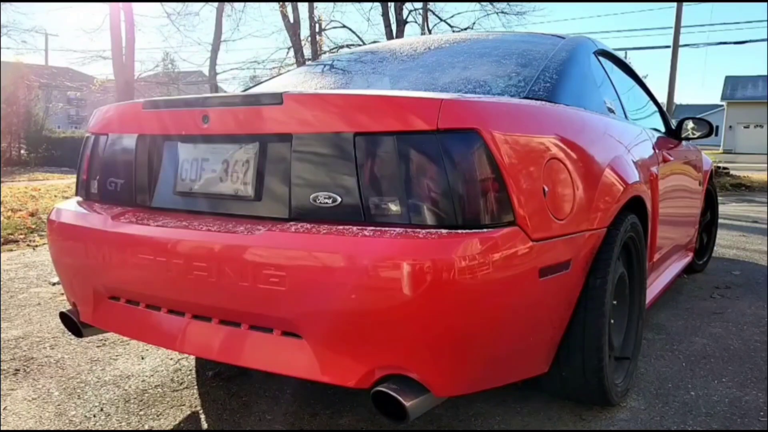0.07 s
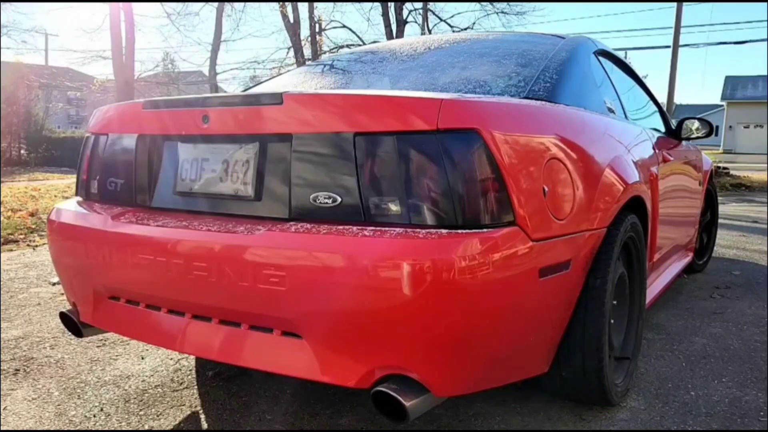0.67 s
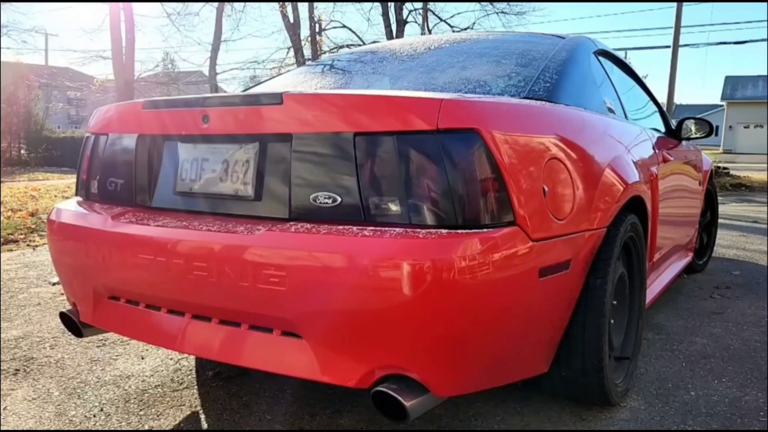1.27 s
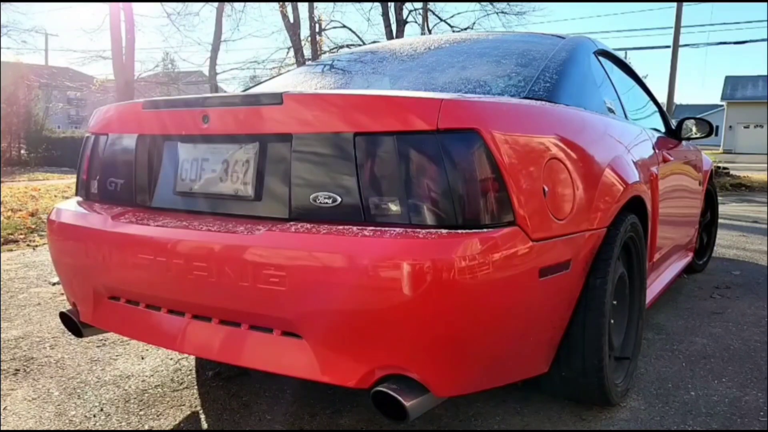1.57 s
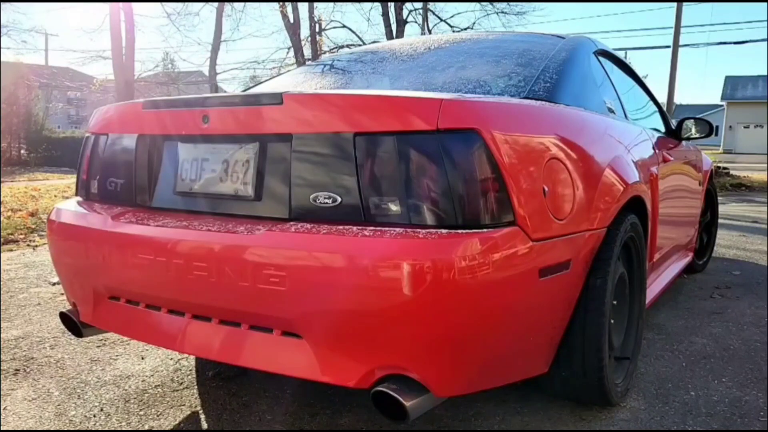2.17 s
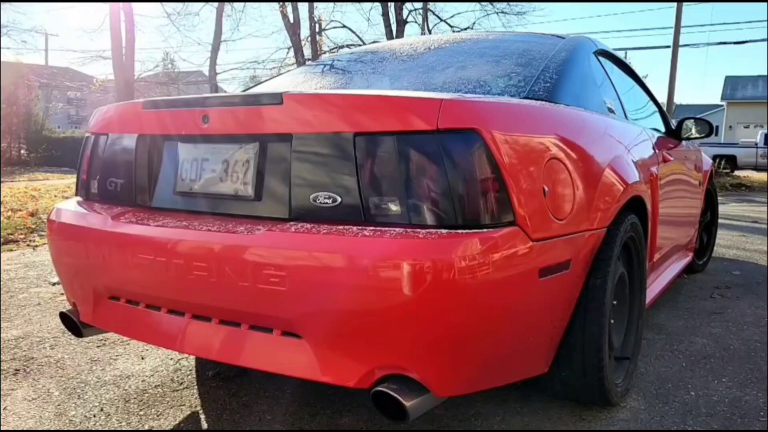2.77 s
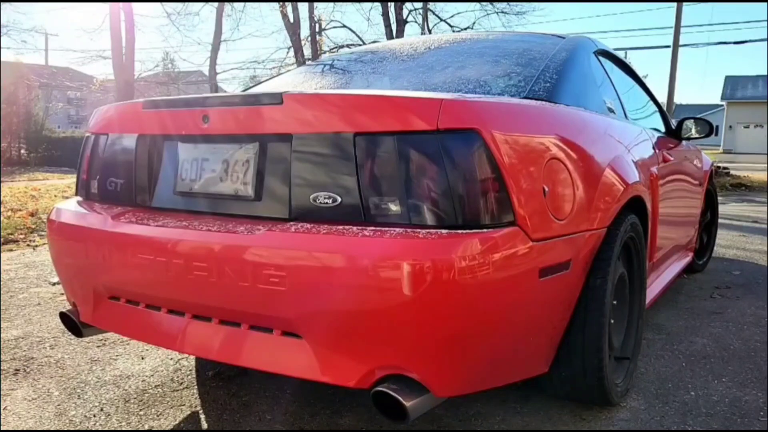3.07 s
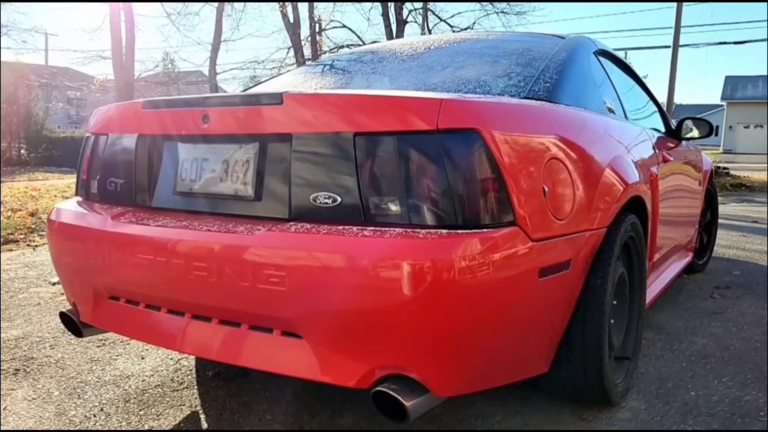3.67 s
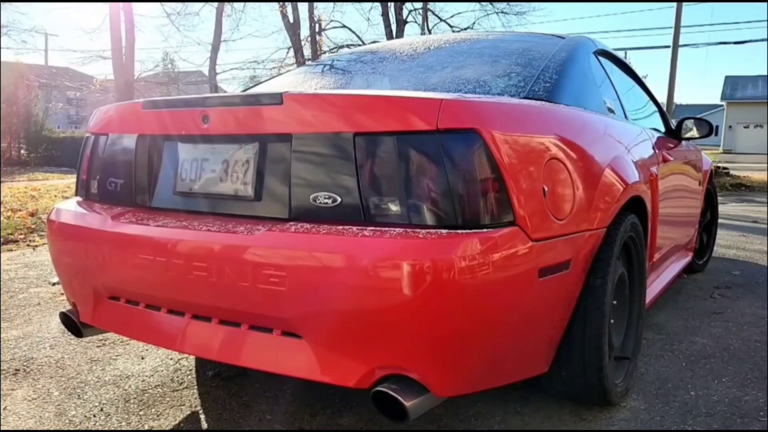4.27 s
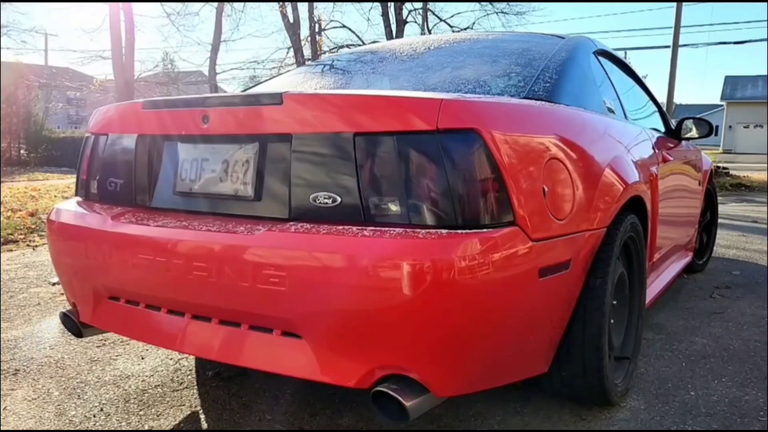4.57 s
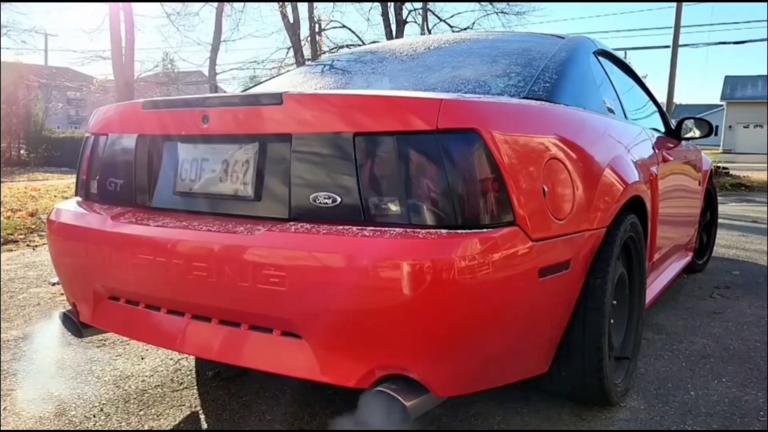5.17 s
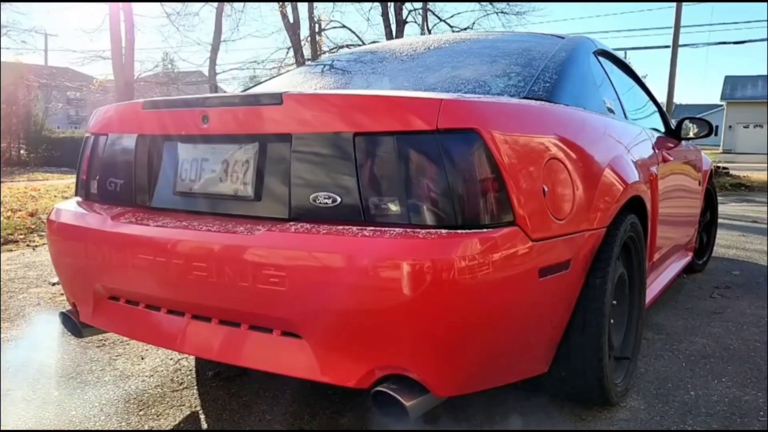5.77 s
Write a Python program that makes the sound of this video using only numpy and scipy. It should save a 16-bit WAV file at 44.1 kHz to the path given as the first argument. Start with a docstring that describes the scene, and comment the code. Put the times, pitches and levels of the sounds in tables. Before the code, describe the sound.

After faint distant traffic, a car engine cranks, fires loudly, revs briefly and drops to a deep, throbbing exhaust rumble.

```python
"""A cold V8 starts on a quiet driveway, heard from just behind its twin tailpipes.
Distant traffic hums and swells. The starter slams in with a clash of teeth, then grinds and groans
against each compression. The engine catches and the street fades down: heavy firings thump, unburnt
fuel pops and air rushes out. The revs flare and sink into a loping fast idle, eight unequal firings
ringing two pipes, while gas hisses out and a thin whistle comes and goes."""
import sys
import numpy as np
from scipy import signal
from scipy.fft import rfft, irfft
from scipy.io import wavfile
from scipy.ndimage import uniform_filter1d

SR = 44100
rng = np.random.default_rng(int(sys.argv[2]) if len(sys.argv) > 2 else 0)


def inscribe(sig):
    """Save sig as 16-bit PCM at rate SR to the path in sys.argv[1].

    A 1-D sig is mono; a 2-D sig holds one channel per row.
    Samples are clipped to [-1, 1] before scaling.
    """
    pcm = np.round(np.clip(np.atleast_2d(sig).T, -1, 1) * 32767)
    wavfile.write(sys.argv[1], SR, pcm.astype(np.int16))


N = 256662
TIME, FREQS = np.arange(N) / SR, np.fft.rfftfreq(N, 1 / SR)

# starter teeth striking as they mesh: start_s, level_db
TOOTH_STRIKES = [(2.351, -17), (2.365, -22.5), (2.38, -43), (2.396, -37), (2.728, -43), (2.763, -31)]
# fuel popping in the pipes: start_s, level_db
FUEL_POPS = [(3.107, -32), (3.121, -7.5), (3.139, -4.5), (3.192, -7), (3.201, -8), (3.221, -4),
             (3.277, -14.5), (3.343, -22.5)]
# the crank flares, sags and recovers: time_s, speed_rpm
CRANK_SPEED = [(3.05, 750), (3.18, 1470), (3.38, 1910), (3.48, 1880), (3.7, 1470), (3.95, 1240),
               (4.25, 1082), (4.55, 1072), (5.1, 1131), (5.82, 1160)]
# how hard the cylinders fire: time_s, effort_db
FIRING_EFFORT = [(3.2, 3), (3.32, 2), (3.7, 0), (4.2, -3), (4.75, 1.7), (5.3, 3.5), (5.8, 3.5)]


def gain_of(db):
    """Decibels to gain."""
    return 10 ** (np.asarray(db) / 20)


def unit_rms(x):
    """Scales to rms 1."""
    return x / np.sqrt(np.mean(x ** 2) + 1e-20)


def local_power(x, samples):
    """Mean square under a sliding soft window."""
    window = np.hanning(samples)
    return abs(signal.fftconvolve(x ** 2, window / window.sum(), "same"))


def levelled(x):
    """Rides the level to rms 1 over a few engine cycles, keeping the throb within a cycle."""
    return x / np.sqrt(local_power(x, SR // 3) + 1e-20)


def automation(points):
    """Joins (time_s, value) points with straight lines."""
    return np.interp(TIME, *np.transpose(points))


def spectrum(points):
    """Joins (frequency_hz, value) points on a log-frequency axis."""
    hz, value = np.transpose(points)
    return np.interp(np.log(FREQS + 1), np.log(hz + 1), value)


def ramp(start_s, length_s):
    """A straight fade from 0 to 1."""
    return np.clip((TIME - start_s) / length_s, 0, 1)


def burst(start_s, decay_s):
    """A sudden attack and an exponential fall."""
    return ramp(start_s, 0.00088) * np.exp(-np.maximum(TIME - start_s, 0) / decay_s)


def swell(x, centre, width):
    """A bell of height 1 around the centre."""
    return np.exp(-((x - centre) / width) ** 2)


def wobble(seconds, points=4096):
    """A smooth random drift of rms 1 that changes over the given time."""
    hz = np.fft.rfftfreq(points, TIME[-1] / points)
    drift = irfft(rfft(rng.standard_normal(points)) * np.exp(-(hz * seconds) ** 2))
    return np.interp(TIME, np.linspace(0, TIME[-1], points), unit_rms(drift))


def noise(colour, grain_db=0):
    """Coloured stereo noise, centred in the bass and wide in the treble; grain_db makes it gritty."""
    # how alike the two ears are: frequency_hz, correlation
    ear_likeness = [(60, 1), (300, 0.89), (700, 0.72), (1500, 0.23), (3000, 0.044), (15000, 0.04)]
    a, b = rng.standard_normal((2, N)) * gain_of(grain_db * np.minimum(rng.exponential(1, N), 5))
    alike = np.clip(spectrum(ear_likeness), 0, 1)
    mid, side = np.sqrt(1 + alike) * rfft(a), np.sqrt(1 - alike) * rfft(b)
    return unit_rms(irfft(np.array([mid + side, mid - side]) * gain_of(spectrum(colour)), N))


def ring(blows, modes, rise_s):
    """Every blow sets the same decaying modes ringing."""
    t, out = np.arange(SR // 2) / SR, np.zeros(N)
    tone = sum(gain_of(db - 60 * t / t60) * np.sin(2 * np.pi * hz * t) for hz, db, t60 in modes)
    tone *= 1 - np.exp(-t / rise_s)
    for s, db in blows:
        out[round(s * SR):][:len(t)] += gain_of(db) * tone / abs(tone).max()
    return out


def tones(rows, fade_s, rise_hz_per_s=0):
    """Held tones that fade in and out and may glide upward."""
    out = np.zeros(N)
    for s, length_s, hz, db in rows:
        age = TIME - s
        fades = ramp(s, fade_s) * (1 - ramp(s + length_s - fade_s, fade_s))
        out += gain_of(db) * np.sqrt(2) * fades * np.sin(2 * np.pi * (hz + rise_hz_per_s * age / 2) * age)
    return out


def off_centre(pair, lag_s):
    """A source off to one side reaches the left ear later."""
    left = irfft(rfft(pair[0]) * np.exp(-2j * np.pi * FREQS * lag_s), N)
    return np.array([left * ramp(0, 0.0069), pair[1]])


def underbody_echoes(pair, db, spread_s=0.025, count=8):
    """A handful of early reflections between the underbody and the ground."""
    delay_s, sign = rng.uniform(0.1, 1, count) * spread_s, rng.choice([-1, 1], count)
    reflections = sign @ np.exp(-2j * np.pi * np.outer(delay_s, FREQS)) / np.sqrt(count)
    return irfft(rfft(pair) * (1 + gain_of(db) * reflections), N) / np.sqrt(1 + gain_of(db) ** 2)


def traffic(pass_s=2.69, pass_width_s=0.53, fade_from_s=3.0, fade_db_per_s=14):
    """Distant traffic swells and brightens; the whole street fades down as the engine catches."""
    # tone of the road's rumble, roar and tyre hiss: frequency_hz, level_db
    rumble_colour = [(15, -33.5), (25, -19.5), (43, -5.5), (97, -2.5), (119, -9.5), (146, -3.5), (252, -19),
                     (288, -15.5), (317, -25.5), (358, -15.5), (450, -47), (580, -68), (990, -120)]
    roar_colour = [(260, -43.5), (450, -14.5), (571, -11), (724, -1.5), (847, -4.5), (919, -12.5),
                   (1100, -10), (1820, -19.5), (2500, -22), (3200, -34.5), (4160, -60.5), (7040, -120)]
    tyre_colour = [(1760, -30), (3000, -3), (5020, -2), (6580, -10), (7510, -5), (10300, -21), (10900, -34),
                   (12800, -23), (15800, -30.5)]
    # low hums from the road: start_s, length_s, pitch_hz, level_db
    hums = [(.02, 0.48, 48.2, -41), (1.65, 0.73, 58, -43.5)]
    near = 1 / np.hypot(1, (TIME - pass_s) / pass_width_s)
    muffled = 1 - ramp(0.25, 0.43)  # the tyre noise starts dull, then opens up
    rumble = gain_of(-41) * noise(rumble_colour)
    roar = gain_of(-52 + 5 * near + 1.37 * wobble(0.14) - 2 * muffled) * noise(roar_colour)
    tyres = gain_of(-74 + 18 * near - 5 * muffled) * noise(tyre_colour)
    street_fade = gain_of(-fade_db_per_s * np.maximum(TIME - fade_from_s, 0))
    return (rumble + roar + tyres + tones(hums, fade_s=0.054)) * street_fade


def ticks():
    """Faint, gritty ticks and rustles close by."""
    # each tick: start_s, level_db, decay_s
    hits = [(.05, -91, 0.0086), (0.134, -59.5, 0.03), (.38, -66, 0.11), (.52, -69, 0.033)]
    # their thin tone: frequency_hz, level_db
    colour = [(2000, -8), (3800, 1), (5500, -12), (7000, -1), (9500, -8), (12000, -22)]
    return noise(colour, grain_db=4.5) * sum(gain_of(db) * burst(s, decay_s) for s, db, decay_s in hits)


def whistle():
    """A thin tone from the engine bay at idle, rising a little in each spurt."""
    # each spurt: start_s, length_s, start_pitch_hz, level_db
    spurts = [(4.33, .135, 3150, -70), (4.49, .14, 3150, -72), (4.68, .06, 3205, -72),
              (4.77, .09, 3150, -68)]
    return tones(spurts, fade_s=0.013, rise_hz_per_s=280)


def chuff(start_s=2.722, attack_s=0.012, decay_s=0.03):
    """A short puff of air escapes while the engine turns over."""
    # its bright tone: frequency_hz, level_db
    colour = [(1500, -20), (5000, 3), (9000, -8), (12000, -11), (15500, 5)]
    return gain_of(-39) * burst(start_s, decay_s) * ramp(start_s, attack_s) * noise(colour)


def tooth_clashes(t60_s=0.075, scrape_db=-10, scrape_decay_s=0.046):
    """The starter's teeth strike with a bright scrape and ring the housing."""
    # tone of the scrape: frequency_hz, level_db
    scrape_colour = [(600, -27), (1400, 6.5), (2800, -2.5), (4500, -9), (8000, -7.5), (11000, -21),
                     (15500, -17)]
    # modes of the housing: pitch_hz, level_db
    housing = [(657, -3.5), (1042, 1), (1227, 1.5), (1570, -1), (1765, -5), (2055, -1), (2690, -1.5),
               (3290, -13), (3850, -15), (4610, -12)]
    envelope = sum(gain_of(db + scrape_db) * burst(s, scrape_decay_s) for s, db in TOOTH_STRIKES)
    clang = ring(TOOTH_STRIKES, [(hz, db, t60_s) for hz, db in housing], rise_s=0.0012)
    return noise(scrape_colour, grain_db=1.5) * envelope + clang


def starter(engage_s=2.346, release_s=3.134, load_width_s=0.0317, groan_width_s=0.031,
            sag_hz_per_s=615, housing_hz=1050, housing_width_hz=45):
    """The gears grind and the motor groans against each compression, then the pinion lets go."""
    # compressions loading the motor: peak_s, chug_db, groan_db, pitch_hz, third_harmonic_db
    compressions = [(2.4, -34, -37.5, 335, -56), (2.53, -53, -40, 300.4, -53),
                    (2.615, -31.5, -46, 318.6, -46), (2.747, -35, -29, 331.8, -29.5),
                    (2.871, -45, -27.5, 349.7, -34.5), (2.995, -35.5, -34, 378, -33)]
    # tone of the grinding gears and of the low chug: frequency_hz, level_db
    grind_colour = [(150, -26), (250, -15), (336, -6.5), (443, -13.5), (672, -10.5), (967, -9), (1040, -14),
                    (1190, -10), (1900, -13.5), (2510, -11), (3150, -20), (3810, -16.5), (7490, -28),
                    (11200, -37.5), (15800, -38)]
    chug_colour = [(15, -26), (25, 1.5), (70, -2), (102, 4.5), (140, -5.5), (239, -5.5), (300, -6),
                   (390, -23), (660, -120)]
    nearest = np.argmin([abs(TIME - row[0]) for row in compressions], axis=0)
    peak_s, chug_db, groan_db, pitch_hz, third_db = np.array(compressions)[nearest].T
    load = swell(TIME, peak_s, load_width_s)
    # the motor slows through each compression
    mesh_hz = pitch_hz - sag_hz_per_s * np.clip(TIME - peak_s, -load_width_s, load_width_s)
    jitter = unit_rms(uniform_filter1d(rng.standard_normal(N), SR // 400))
    mesh = 2 * np.pi * np.cumsum(mesh_hz * (1 + 0.019 * jitter)) / SR

    grind = unit_rms(noise(grind_colour, grain_db=1.5) * (1 + 0.26 * np.cos(mesh)))
    strain = gain_of(0.26 * (groan_db - groan_db.max()))  # harder compressions grind louder
    bite = burst(TOOTH_STRIKES[0][0], decay_s=0.03)
    grind = underbody_echoes(grind, db=-3) * gain_of(-33.5 + 4 * load * strain + 5 * bite)
    chug = (gain_of(-42) + gain_of(chug_db) * load) * noise(chug_colour)
    groan = np.sin(mesh) + gain_of(-14) * np.sin(2 * mesh)
    groan *= gain_of(groan_db) * swell(TIME, peak_s, groan_width_s)
    # the third harmonic sings as it slides through a resonance of the housing
    detuning = (3 * mesh_hz - housing_hz) / housing_width_hz
    whine = gain_of(third_db) * load * np.sin(3 * mesh) / np.hypot(1, detuning)
    return (grind + chug + groan + whine) * ramp(engage_s, 0.0027) * (1 - ramp(release_s, 0.16))


def engine_catch(puff_decay_s=0.0052, bark_waver=0.0151):
    """The first firings thump, unburnt fuel pops with a puff and a crack, and the pipes bark briefly."""
    # first heavy firings: start_s, level_db
    firings = [(3.047, -17), (3.077, -1), (3.1, -7)]
    # ring of a thump and of a pop's crack: pitch_hz, level_db, t60_s
    thump_modes = [(94.2, 15, 0.087), (47.6, -0.5, 0.22), (135.3, -4.5, 0.26)]
    crack_modes = [(380, -2, 0.01), (950, -0.5, 0.0082), (1400, 0, 0.0073), (3670, -11, 0.0047)]
    # tone of a pop's puff: frequency_hz, level_db
    puff_colour = [(150, -10), (350, 16), (600, -22), (1000, 1), (1650, -8.5), (2200, -30), (6000, -26),
                   (15000, -50)]
    # upper pipe resonances singing out: peak_s, half_length_s, pitch_hz, level_db
    bark_notes = [(3.111, .018, 282, -17.5), (3.135, 0.021, 362, -17), (3.203, 0.041, 358, -14),
                  (3.219, 0.021, 258, -21), (3.276, 0.021, 294, -18)]
    thumps = ring(firings, thump_modes, rise_s=0.0064)
    puffs = noise(puff_colour) * sum(gain_of(db - 4) * burst(s, puff_decay_s) for s, db in FUEL_POPS)
    cracks = gain_of(-1) * ring(FUEL_POPS, crack_modes, rise_s=0.00026)
    wavering_time = np.cumsum(1 + bark_waver * wobble(0.011)) / SR
    barks = sum(gain_of(db) * swell(TIME, s, half_s) * np.sin(2 * np.pi * hz * wavering_time)
                for s, half_s, hz, db in bark_notes)
    return puffs - cracks - thumps + np.sqrt(2) * barks


def gas_rush(flow, peak_s=3.119, rise_db_per_s=121, fall_db_per_s=66, tail_db_per_s=24, pulsing=0.16):
    """Air rushes at the catch; then gas hisses out with the effort, harder on each outward pulse."""
    # tone of the rush and of the idle hiss: frequency_hz, level_db
    rush_colour = [(290, -48), (500, 0), (677, -8), (1060, -9.5), (1170, -17), (1300, -12.5), (2280, -26.5),
                   (4060, -19.5), (4760, -19), (7040, -20), (9120, -23.5), (14900, -26.5), (15800, -23)]
    hiss_colour = [(280, -27), (480, -8.5), (564, -2.5), (615, -9), (672, -3.5), (712, -14), (801, -8.5),
                   (983, -11.5), (1150, -8), (2040, -16.5), (2660, -23), (5050, -24), (15100, -32.5),
                   (15800, -29.5)]
    before, after = np.maximum(peak_s - TIME, 0), np.maximum(TIME - peak_s, 0)
    attack = gain_of(-rise_db_per_s * before) * ramp(3.04, 0.014)
    gulp = gain_of(-25 - fall_db_per_s * after) + gain_of(-46 - tail_db_per_s * after)
    blast = gain_of(-20) * burst(FUEL_POPS[2][0], decay_s=0.0057)  # one early pop drives out air
    rush = noise(rush_colour, grain_db=4.5) * (gulp + blast) * attack
    hiss_db = -53.5 + 1.17 * automation(FIRING_EFFORT)
    hiss = noise(hiss_colour, grain_db=1.5) * gain_of(hiss_db) * ramp(3.57, 0.4)
    return (rush + hiss) * np.maximum(1 + pulsing * levelled(flow), 0)


def crank_cycles(zero_s=5.2):
    """Running count of four-stroke cycles, two turns of the crank each."""
    cycle = np.cumsum(automation(CRANK_SPEED)) / (120 * SR)
    return cycle - np.interp(zero_s, TIME, cycle)


def muffler(spectra, cutoff_hz=415, leak=0.06):
    """Turns spectra into sound through a steep low-pass that leaks a little treble."""
    return irfft(spectra * (1 / np.sqrt(1 + (FREQS / cutoff_hz) ** 24) + leak), N)


def pipe_resonances(cycle, scatter_db, tilt_pivot_hz=150):
    """Each cylinder's firings ring its bank's pipe; one signal per resonance, low to high."""
    # each cylinder: place_in_cycle_eighths, bank (0 or 1), strength_db, tilt_db_per_octave
    cylinders = [(0.25, 0, -1.2, 5.9), (1.42, 1, 4.4, -4.7), (2.25, 0, 3.1, -5.8), (3.23, 0, -9.4, 4.2),
                 (4.54, 1, -11.6, -0.9), (5.18, 0, 2.3, -4.5), (6.29, 1, 1.1, 4.0), (7.59, 1, 1.7, 1.2)]
    # resonances of each bank's pipe: pitch_hz, width_hz, level_db
    first_pipe = [(53.9, 13.6, -10.8), (106.9, 26.0, 0.2), (175.3, 43.9, -4.4), (286.2, 42.7, -5.2),
                  (368.1, 30.5, -11.7)]
    second_pipe = [(48.8, 10.5, -6.2), (116.7, 25.8, 2.2), (192.8, 49.4, -8.5), (287.0, 42.1, -6.0),
                   (356.0, 29.1, -9.4)]
    firings = [np.flatnonzero(np.diff(np.floor(cycle - row[0] / 8))) for row in cylinders]
    scatter = gain_of(scatter_db * rng.standard_normal(N))
    spectra = np.zeros((len(first_pipe), len(FREQS)), complex)
    for side, pipe in enumerate((first_pipe, second_pipe)):
        for k, (hz, width_hz, db) in enumerate(pipe):
            pulses, octaves = np.zeros(N), np.log2(hz / tilt_pivot_hz)
            for at, (_, bank, strength_db, tilt) in zip(firings, cylinders):
                if bank == side:
                    pulses[at] += scatter[at] * gain_of(db + strength_db + tilt * octaves)
            loss = 1j * FREQS * width_hz
            spectra[k] += rfft(pulses) * (loss / (hz ** 2 - FREQS ** 2 + loss)) ** 2
    return muffler(spectra)


def flare_overtones(cycle, drive, rough_db=3, jitter_rad=0.64):
    """Rough overtones ring through the muffler at the top of the flare."""
    # overtones of the racing engine: multiple_of_cycle_rate, level_db
    overtones = [(13, -28.5), (21, -29.5), (29, -33.5)]
    tone = np.zeros(N)
    for multiple, db in overtones:
        level = np.sqrt(2) * gain_of(db + rough_db * wobble(0.017))
        tone += level * np.sin(2 * np.pi * multiple * cycle + jitter_rad * wobble(0.025))
    return muffler(rfft(tone * drive * ramp(3.27, 0.075) * (1 - ramp(3.43, 0.13))))


def exhaust(cycle, idle_rpm=1130, flare_rpm=1464, lope_from_s=3.54):
    """Eight unequal firings a cycle ring two pipes; their uneven pattern is the lope."""
    # sub, boom, drone and bark follow the effort and swell or dip near one speed:
    # level_db, db_per_effort_db, swell_db, centre_rpm, width_rpm
    voices = [(-36, 0.64, 6, 1156, 46), (-27.5, 1.12, 8.5, 1580, 430), (-29, 0.83, 4.5, 1075, 23),
              (-28, 1, -2.5, 1700, 320)]
    rpm, effort_db = automation(CRANK_SPEED), automation(FIRING_EFFORT)
    racing = np.clip((rpm - idle_rpm) / (flare_rpm - idle_rpm), 0, 1)
    sub_gain, boom_gain, drone_gain, bark_gain = (
        gain_of(db + follow * effort_db + swell_db * swell(rpm, centre, width))
        for db, follow, swell_db, centre, width in voices)
    sub, boom, drone, bark, top = pipe_resonances(cycle, scatter_db=2.1 + 5.3 * racing)
    # the sub wakes once the revs fall and the firing turns uneven
    sub = levelled(sub) * gain_of(-15 * (1 - ramp(lope_from_s, 0.045)))
    # in the flare the boom becomes one clean tone at the firing rate
    clean = 0.97 * racing ** 2
    boom = np.sqrt(1 - clean) * levelled(boom) + np.sqrt(2 * clean) * np.sin(2 * np.pi * 8 * cycle)
    # the bark swells once a cycle; at idle the top resonance swells further, on the hardest firings
    lope_db = 1.5 * (0.5 - racing) * np.cos(2 * np.pi * (cycle - 0.22))
    top_db = 1 + 3 * (1 - racing) * np.cos(2 * np.pi * (cycle - 0.21))
    bark = levelled((bark + gain_of(top_db) * top) * gain_of(lope_db))
    low = (sub_gain * sub + boom_gain * boom) * ramp(3.15, 0.05)
    high = (drone_gain * levelled(drone) + bark_gain * bark) * ramp(3.06, 0.22)
    return low + high + flare_overtones(cycle, drive=gain_of(effort_db) * racing)


def settling_throb(flow, early_squash=0.72, late_squash=0.068, settle_s=4.64, window_s=0.04):
    """At first the firings run together; the swell within each cycle deepens as the idle settles."""
    throb = np.sqrt(local_power(levelled(flow), int(window_s * SR) + 3) + 0.05)
    squash = (early_squash + (late_squash - early_squash) * ramp(settle_s, 0.8)) * ramp(3.3, 0.1)
    return flow / throb ** squash


def scene(tilt_left_db=0.54):
    """Tailpipes close by and a little to one side, the engine bay beyond, the street far off."""
    flow = settling_throb(exhaust(crank_cycles()))
    pipes = off_centre(flow + underbody_echoes(gas_rush(flow), db=-4), lag_s=0.00017)
    start_up = off_centre(tooth_clashes() + starter() + chuff() + engine_catch() + whistle(), lag_s=0.0001)
    street = off_centre(traffic() + ticks(), lag_s=0.00036)
    return (pipes + start_up + street) * gain_of([[tilt_left_db], [-tilt_left_db]])


def record(dry, ceiling=0.84, cutoff_hz=15800):
    """A soft clip rounds the loudest peaks, then a steep low-pass trims the highest treble."""
    rounded = dry / (1 + (dry / ceiling) ** 8) ** (1 / 8)
    low_pass = signal.firwin(511, cutoff_hz, window=("kaiser", 9), fs=SR)
    return signal.oaconvolve(rounded, low_pass[None], "same")


dry = scene()
out = record(dry)
inscribe(out)
```